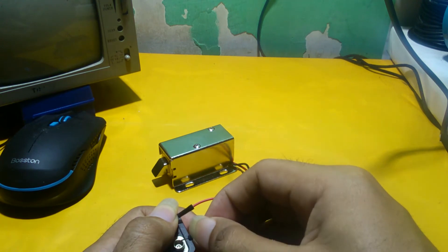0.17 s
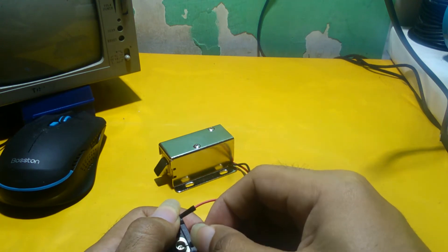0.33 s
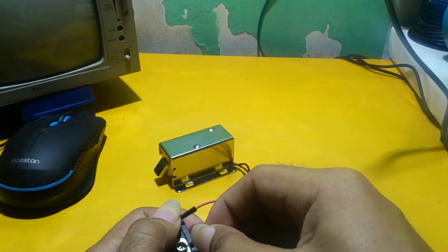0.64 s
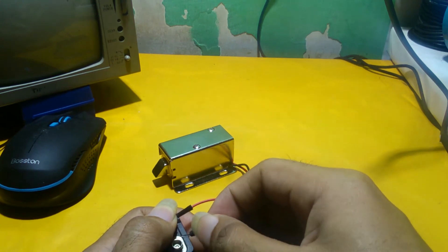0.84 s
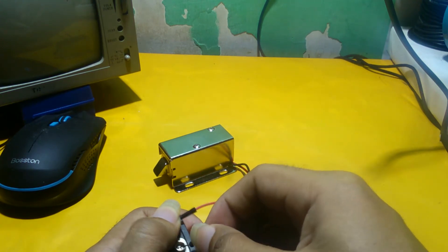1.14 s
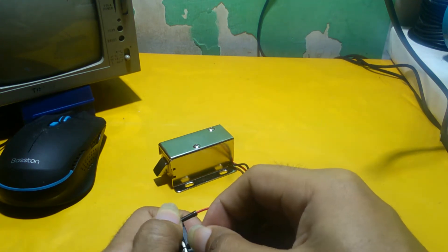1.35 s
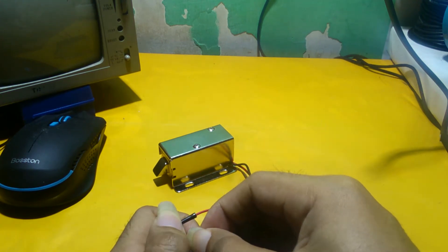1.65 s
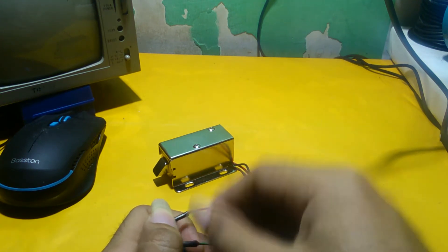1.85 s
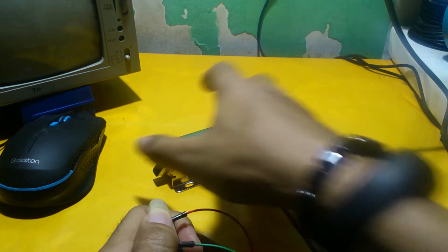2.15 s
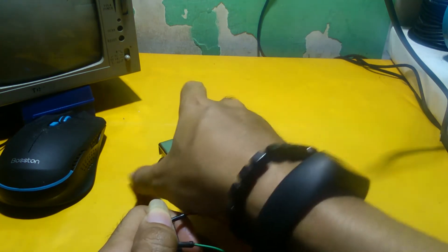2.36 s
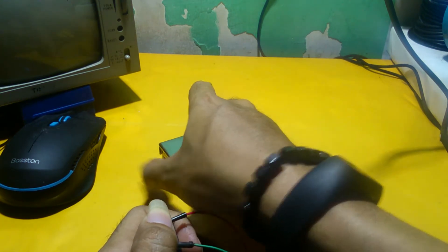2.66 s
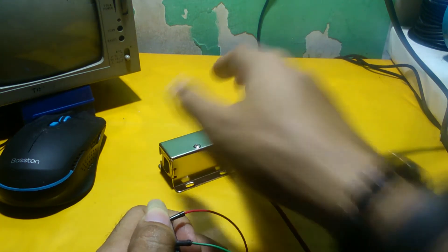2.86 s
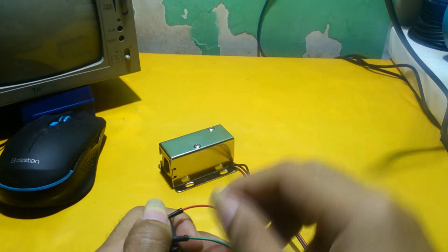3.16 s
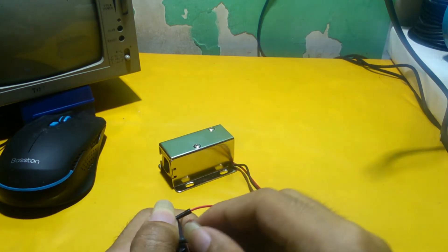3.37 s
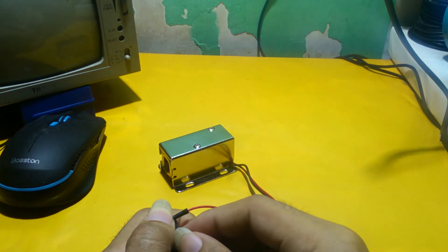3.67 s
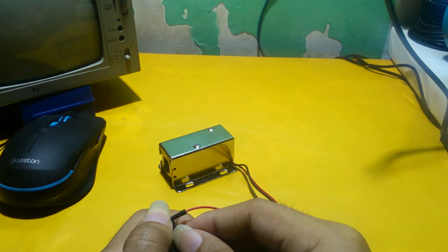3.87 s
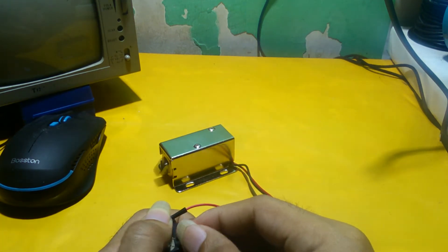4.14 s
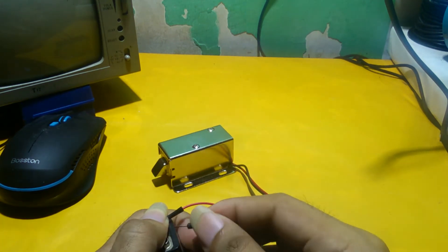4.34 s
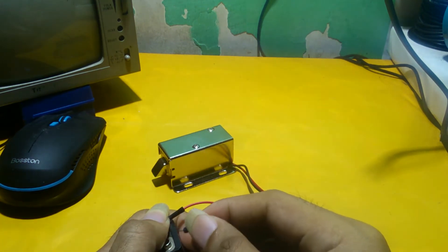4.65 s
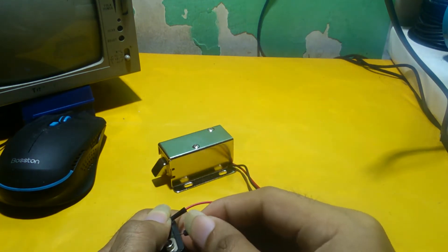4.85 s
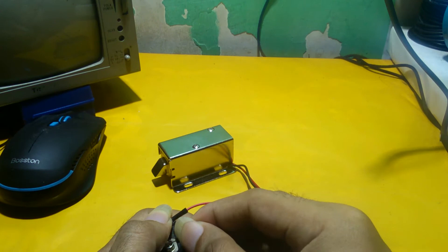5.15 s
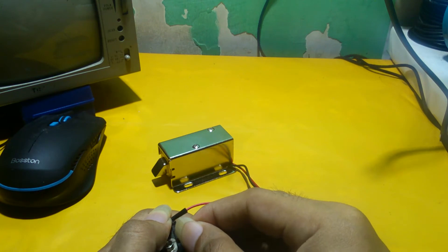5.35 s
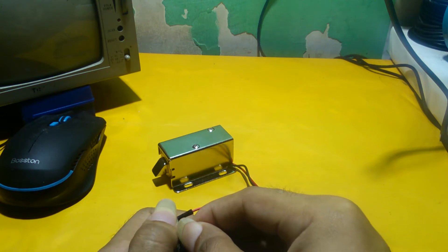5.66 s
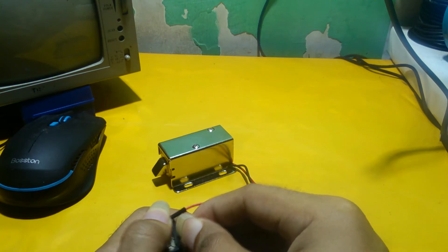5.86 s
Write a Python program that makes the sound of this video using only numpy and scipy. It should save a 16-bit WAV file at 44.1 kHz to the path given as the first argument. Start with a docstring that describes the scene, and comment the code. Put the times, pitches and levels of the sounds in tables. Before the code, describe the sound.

In a small quiet room, light handling ticks come from a metal door latch on a desk, close to the microphone and a little to the left. Its bolt clicks in sharply, then after a pause springs out with a bright clack and a slight knock on the desktop. Small ticks come near the end. Underneath are a soft wavering rumble, steady hiss, faint clock ticks and barely audible insect trills.

```python
"""Solenoid latch on a desk

A small latch on a wooden desk, close to a stereo phone and a little to its left. Wire and spring give light
ticks close by, a thumb snaps the bolt in and the spring throws it out; each blow rings metal and desk. A wall
clock steps its gears and an insect trills far off. Underneath, a low rumble wavers in the resonances of the
small room, over the hiss of the microphones."""
import sys
import numpy as np
from scipy import signal
from scipy.fft import rfft, irfft
from scipy.io import wavfile
from scipy.ndimage import uniform_filter1d

SR = 44100
rng = np.random.default_rng(int(sys.argv[2]) if len(sys.argv) > 2 else 0)


def to_wav(sig):
    """Store sig (one row per channel, or 1-D mono) as 16-bit WAV at the path in sys.argv[1].

    Samples outside -1..1 are clipped; the rate is SR.
    """
    pcm = np.clip(np.atleast_2d(sig), -1, 1) * 32767
    pcm = np.round(pcm).astype(np.int16)
    wavfile.write(sys.argv[1], SR, pcm.T)  # frames by channels


N = 264908
T = np.arange(N) / SR

# Blows on the latch; lean is always left microphone minus right: (time [s], peak of desk, plate,
# frame, catch, housing, plunger, bolt [dB each], lean [dB], chatter decay [ms])
LATCH_BLOWS = [(0.0004, -58, -53, -41, -49, -45.5, -52.5, -51.5, -2.5, 1.44),
               (0.3640, -74, -70, -63, -62, -55, -57, -46, 10, 0.61),
               (0.3674, -77, -75, -53, -52, -53.5, -55, -51, 8, 1.9),
               (0.7930, -65, -60, -45.5, -54, -46, -48, -38.5, 7, 6.1),
               (0.8027, -48.5, -39.5, -32.5, -47, -38.5, -46, -46, 5, 0.42),
               (0.8063, -47.5, -60, -48, -60, -42.5, -47, -50, 11, 1.8),
               (0.8111, -49, -47, -42.5, -49, -49, -51, -54, 6, 1.7),
               (1.1872, -66, -65, -59, -66, -64, -63, -64, 8, 5),
               (1.1930, -80, -75, -63, -68, -58, -58, -55, 3, 1),
               (1.2010, -76, -64, -54, -58, -51.5, -50, -60, 7.5, 0.85),
               (1.8770, -63, -69, -59, -68, -62, -63, -61, 1, 1.3),
               (2.4290, -60.5, -59, -57.5, -69, -62, -62, -64, 5, 13.6),
               (2.4930, -70, -68, -55, -66, -70, -74, -72, 1, 13),
               (2.542, -56, -62, -53.5, -56, -66, -64, -64, 5, 63),
               (2.5761, -44.5, -41.5, -24.5, -40.5, -23.5, -15.5, -19, 8, 1.33),
               (2.5805, -43, -36, -30, -62.5, -23.5, -21.5, -23, 5.5, 1.1),
               (2.5863, -54, -44, -35.5, -66, -33, -35.5, -38, 6.5, 2.3),
               (3.3700, -49, -64, -72, -80, -80, -81, -80, 1, 1.9),
               (3.39, -52, -71, -77, -80, -80, -80, -82, 1, 1.9),
               (4.1856, -49, -62, -42.5, -47.5, -45, -54, -56, 5.5, 5.3),
               (4.195, -48.5, -54, -35, -44, -48, -48, -57, -1, 4.3),
               (4.2030, -43, -44, -36, -46, -35, -33, -47, 12, 2.5),
               (4.2058, -30, -28.5, -29, -22.5, -19.5, -24.5, -19.5, 6, 1.07),
               (4.2107, -37, -28.5, -31, -45, -28.5, -21, -19, 2, 2.7),
               (4.2170, -45.5, -48, -32, -45, -30, -40, -30, 8, 1.8),
               (4.2241, -33, -38, -28.5, -34.5, -44.5, -32, -48, 0.5, 3.2),
               (4.2340, -48, -46, -32, -47, -33, -46, -50, 3, 4.1),
               (4.2421, -49, -40, -38, -55, -39.5, -49, -49, 9, 1.8),
               (4.2470, -44.5, -50, -36, -45, -33, -50, -55, 1, 0.58),
               (5.4478, -72, -60, -54, -63, -58, -57, -58, 4, 2.6),
               (5.9173, -78, -71, -67, -66, -55, -47, -45.5, -8, 1.2),
               (5.926, -67, -61, -49, -58, -51.5, -54, -53, -0.5, 4),
               (5.944, -59, -57, -46, -55, -60, -62, -66, 1, 1.8)]
# Modes of the desk, latch parts and clock: (frequency [Hz], relative level [dB], t60 [s], lean [dB])
DESK_MODES = [(158.5, -4.5, 0.11, 2), (222, -16, 0.032, 8), (278.7, -0.5, 0.082, 3.5), (333, 6, 0.033, 1.5),
              (410, -3.5, 0.025, 1.5), (488, -10, 0.093, -7.5)]
PLATE_MODES = [(679, -5.5, 0.02, 1), (870, -19.5, 0.03, -2.2), (926, 8.5, 0.016, -1.6),
               (1124, 1.5, 0.016, -1.95), (1280, -1, 0.018, 0)]
FRAME_MODES = [(1556, -7.5, 0.028, 3.4), (1887, 0, 0.025, 3.6), (2120, 6.5, 0.0088, 7.7),
               (2386, -1.5, 0.016, 7), (2660, -3, 0.0099, 3.3)]
CATCH_MODES = [(3435, -0.2, 0.012, 10), (3610, -0.8, 0.017, 6)]
HOUSING_MODES = [(3822, -4, 0.013, 6.6), (3900, -5, 0.012, 6), (4240, 1, 0.011, 4.3),
                 (4870, 4.5, 0.013, 7.8), (5130, 5, 0.017, 2)]
PLUNGER_MODES = [(6100, 0, 0.018, -4), (6535, 2.4, 0.017, 15), (7050, 1.2, 0.019, -6.5),
                 (7580, -1.8, 0.016, -13), (8050, 1.4, 0.013, -6.5), (8500, -2, 0.0052, -8)]
BOLT_MODES = [(9210, -0.5, 0.018, -2), (9820, 3, 0.024, -15.5), (10170, -3, 0.031, 13.5),
              (11100, 4.5, 0.014, -0.5), (11920, -2, 0.008, 3.5), (12600, -10, 0.007, -11),
              (13800, -18, .006, -11)]
CLOCK_MODES = [(1470, -6, 0.0097, -1), (1690, -13, 0.015, 19), (2144, 2, 0.014, 19), (2600, -9, 0.0059, 21),
               (3000, -5, 0.0062, 0), (3500, -2, 0.011, 21)]
# Three low room resonances: (frequency [Hz])
RESONANCES_HZ = [59.8, 83.4, 113.3]
# Rumble in those resonances: (time [s], low [dB], middle [dB], high [dB])
RUMBLE_LEVELS = [(0.0, -79, -67.5, -63), (0.37, -63.5, -54, -67.5), (0.78, -61.5, -51, -73),
                 (0.8, -68, -55.5, -69), (1.25, -56.5, -56.5, -67), (1.37, -82, -57.5, -64),
                 (1.44, -59, -48.5, -67), (1.69, -66, -69, -68), (1.74, -56, -55, -64),
                 (1.99, -62, -62, -73), (2.87, -64.5, -55, -64.5), (3.19, -63.5, -65.5, -67.5),
                 (4.13, -58.5, -62.5, -73), (4.16, -63, -65, -63.5), (4.83, -62.5, -60, -75),
                 (5.11, -48, -69.5, -67), (5.23, -68.5, -64, -66), (5.58, -59, -76, -69),
                 (5.97, -59, -59, -64.5), (6.0, -58, -74, -72)]
# Room murmur and microphone hiss: (frequency [Hz], relative density [dB])
AIR_SPECTRUM = [(20, 15.5), (32, 7), (48, 14), (80, 10), (115, 8.5), (140, 3), (190, 0), (280, -7),
                (480, -9.5), (685, -12), (1070, -15), (1400, -19), (2500, -19.5), (4500, -21), (6300, -22),
                (7900, -19), (9800, -24), (14300, -27.5)]
# Drift of the treble hiss: (time [s], gain [dB])
HISS_DRIFT = [(0, 2.5), (.3, 1.5), (1, 2), (1.7, 1.5), (2.3, 3), (2.9, 3.5), (3.3, 2.15), (4, 1.9),
              (4.8, 1.8), (5.3, 1.6), (5.6, 4), (6.01, -0.5)]
# Likeness of diffuse sound at the two microphones: (frequency [Hz], correlation [0..1])
MIC_CORRELATION = [(30, 0.51), (60, 0.85), (130, 0.92), (290, 0.7), (630, 0.48), (1400, 0), (15000, 0)]
# Light contact ticks, and one short ring of the latch frame as the bolt snaps:
# (time [s], peak [dB], pitch [Hz], t60 [s], lean [dB])
CONTACT_TICKS = [(.3493, -53, 8500, .002, 0), (0.3637, -42.5, 2260, 0.014, 15),
                 (.3643, -40.5, 10950, 0.0089, 3), (0.367, -44, 2240, 0.012, 17),
                 (.7846, -50, 10000, .002, 0), (1.1885, -52, 2250, .012, 5), (1.2018, -48, 1910, 0.019, 13),
                 (1.202, -48, 3600, 0.0054, 10), (2.5776, -30.5, 1515, 0.04, 11),
                 (5.9164, -34.5, 9200, .004, 3), (5.9177, -48, 6200, .005, -4),
                 (4.1811, -27.5, 7540, .0015, 8), (4.1832, -34, 7460, .004, 4)]
# Far insect trills: (start [s], time until release [s], level [dB])
INSECT_TRILLS = [(.42, 1.25, -75.5), (4.416, 0.65, -78)]
# Gear steps within one clock tick: (offset [s], gain [dB])
GEAR_STEPS = [(-.014, -5), (0, 0), (.022, -10.5), (.036, -21), (.052, -27)]
# Decay of the room's echo: (frequency [Hz], t60 [s])
ECHO_DECAY = [(150, 0.29), (600, 0.43), (1500, 0.29), (4000, 0.36), (8000, 0.36), (14000, 0.26)]
# Colour of the echo: (frequency [Hz], relative level [dB])
ECHO_COLOUR = [(120, -10), (300, -2), (1000, -4), (2200, -8), (2700, -5.5), (3000, -5), (3400, -13),
               (3800, -5.5), (5000, -5.5), (7000, -3), (10000, -4.5), (14000, -0.5)]
# Side the echo favours: (frequency [Hz], lean [dB])
ECHO_LEAN = [(300, 2), (2000, 0), (4500, 2.5), (6500, -7), (14000, -6)]

TRILL_HIGH_HZ, TRILL_LOW_HZ, TRILL_WIDTH_HZ = 3290, 3060, 130
TRILL_WAVER_HZ, TRILL_SAG_HZ_PER_S = 12, 60
TRILL_ATTACK_S, TRILL_RELEASE_S, TRILL_FADE_DB_PER_S = .2, .15, 3


def undb(db):
    """Decibels to amplitude."""
    return 10 ** (np.asarray(db) / 20)


def on_log(hz, table):
    """Read (Hz, value) rows on a log-frequency axis."""
    freqs, values = np.transpose(table)
    return np.interp(np.log(np.maximum(hz, 1)), np.log(freqs), values)


def walk(per_s):
    """Smooth random drift, per_s steps a second, with a spread near 1."""
    hold = int(SR / per_s)
    steps = np.repeat(rng.standard_normal(N // hold + 1), hold)
    return 2 * uniform_filter1d(uniform_filter1d(steps, hold), hold)[:N]


def stereo_noise(size):
    """Frequencies and noise spectra at the two microphones: alike in the bass, unrelated on top."""
    hz = np.fft.rfftfreq(size, 1 / SR)
    alike = on_log(hz, MIC_CORRELATION)
    mid, side = rfft(rng.standard_normal((2, size)))
    mid, side = mid * np.sqrt((1 + alike) / 2), side * np.sqrt((1 - alike) / 2)
    return hz, np.array([mid + side, mid - side])


def lean(db):
    """Gains for (left, right, room feed) that put the left db above the right."""
    return undb(np.array([[db], [-db], [0]]) / 2)


def add(track, start, sound):
    """Mix sound into track from start, in seconds."""
    i = int(start * SR)
    sound = sound[:, :N - i]
    track[:, i:i + sound.shape[1]] += sound


def chatter(decay_ms):
    """One blow: a burst of uneven contacts that builds quickly and dies away."""
    age = np.arange(SR // 20) / SR * 1000 / decay_ms
    contacts = rng.standard_normal(len(age)) * undb(2.1 * rng.exponential(size=len(age)))
    return contacts * (1 - np.exp(-age / 0.36)) * np.exp(-age)


def ring(modes, lag_s, spot_db=1.2):
    """Modes at the left microphone, the farther right one and the walls, varied by the spot struck."""
    t = np.arange(SR // 8) / SR
    since_arrival = np.maximum(t - np.array([[0], [lag_s], [0]]), 0)
    t60_scale = np.array([[1], [1], [0.43]])  # the walls hear every face, so modes blur into bands
    out = np.zeros((3, len(t)))
    for hz, db, t60, lean_db in modes:
        detune, spot = rng.standard_normal(2)
        phase = 2 * np.pi * hz * (1 + 0.018 * detune) * since_arrival
        decay = undb(-60 * t / (t60 * t60_scale))
        out += undb(db + spot_db * spot) * lean(lean_db) * np.sin(phase) * decay
    return out


def strike(modes, push, peak_db, lag_s=0.0002655, widen=1):
    """A push rings the modes up to a peak at the microphones; the room feed gets equal energy."""
    body = ring(modes, lag_s)
    sound = signal.fftconvolve(body, push[None], axes=1)[:, :body.shape[1]]
    sound[2] = body[2]  # over all directions the contacts merge into one even knock
    # a small body moves little air below its lowest mode or above its highest
    band_hz = [.92 * modes[0][0] / widen, min(1.07 * modes[-1][0] * widen, .45 * SR)]
    sound = signal.sosfilt(signal.butter(3, band_hz, "band", fs=SR, output="sos"), sound)
    sound[2] *= np.sqrt(np.mean(sound[:2] ** 2) / np.mean(sound[2] ** 2))
    return sound * undb(peak_db) / np.abs(sound[:2]).max(axis=1).mean()


def latch():
    """Close, a little left: each blow rings every metal part and thumps the desk below."""
    parts = [FRAME_MODES, CATCH_MODES, HOUSING_MODES, PLUNGER_MODES, BOLT_MODES]
    out = np.zeros((3, N))
    for start, desk_db, plate_db, *part_dbs, lean_db, decay_ms in LATCH_BLOWS:
        push = chatter(decay_ms)
        metal = sum(strike(modes, push, db) for modes, db in zip(parts, part_dbs))
        metal += strike(PLATE_MODES, push, plate_db, lag_s=0.0001)
        # the wide desk top feels one downward push and reaches both microphones at once
        desk = strike(DESK_MODES, np.abs(chatter(decay_ms=0.23)), desk_db, lag_s=0)
        add(out, start, metal * lean(lean_db) + desk)
    return out


def rumble(waver=0.0262, throb_db=2):
    """All around: each low room resonance wavers in pitch and throbs on its own."""
    times, *levels = np.transpose(RUMBLE_LEVELS)
    out = 0
    for hz, db in zip(RESONANCES_HZ, levels):
        phase = 2 * np.pi * np.cumsum(hz * (1 + waver * walk(9))) / SR
        mic_phase = 0.13 * walk(6) * np.array([[1], [-1]])
        rms = undb(np.interp(T, times, db) + throb_db * walk(16))
        out += np.sqrt(2) * rms * np.sin(phase + mic_phase + 2 * np.pi * rng.random())
    return out


def murmur_and_hiss(level_db=-66):
    """Steady room murmur under microphone hiss whose treble drifts a little."""
    hz, spectrum = stereo_noise(N)
    spectrum *= undb(on_log(hz, AIR_SPECTRUM))
    above_bass = irfft(spectrum * (hz > 140), N)
    spectrum *= undb(level_db) / np.sqrt(np.mean(above_bass ** 2))
    treble = np.clip(np.log2(np.maximum(hz, 1) / 810), 0, 1)
    drift = undb(np.interp(T, *np.transpose(HISS_DRIFT)))
    return irfft(spectrum * (1 - treble), N) + irfft(spectrum * treble, N) * drift


def contact_ticks(room_trim_db=-4):
    """Close up: light contact ticks and one short ring of the frame, each a single damped resonance."""
    out = np.zeros((3, N))
    for start, db, hz, t60, lean_db in CONTACT_TICKS:
        add(out, start, strike([(hz, 0, t60, lean_db)], chatter(decay_ms=0.14), db, widen=1.77))
    out[2] *= undb(room_trim_db)
    return out


def insect(low_strand_db=-5, throb_db=.8):
    """Far off: two narrow, sagging strands, blurred by distance and unrelated at the microphones."""
    narrow = signal.butter(2, TRILL_WIDTH_HZ / 2, fs=SR, output="sos")
    out = 0
    for hz, strand_db in [(TRILL_HIGH_HZ, 0), (TRILL_LOW_HZ, low_strand_db)]:
        cos_noise, sin_noise = signal.sosfilt(narrow, rng.standard_normal((2, 2, N)))
        waver = np.cumsum(TRILL_WAVER_HZ * walk(6)) / SR
        throb = undb(strand_db + throb_db * walk(9))
        for start, hold, db in INSECT_TRILLS:
            age = T - start
            phase = 2 * np.pi * ((hz - TRILL_SAG_HZ_PER_S * age / 2) * age + waver)
            strand = cos_noise * np.cos(phase) + sin_noise * np.sin(phase)
            strand /= np.sqrt(np.mean(strand ** 2))
            swell = np.clip(age / TRILL_ATTACK_S, 0, 1)
            release = np.clip(1 - (age - hold) / TRILL_RELEASE_S, 0, 1)
            out += strand * undb(db - TRILL_FADE_DB_PER_S * age) * swell * release * throb
    return out


def wall_clock(first_s=.5783, period_s=1.0012, peak_db=-57):
    """On the wall: one tick a second, each a few quick steps of plastic gears."""
    out = np.zeros((3, N))
    for start in np.arange(first_s, N / SR - period_s / 4, period_s):
        for offset, step_db in GEAR_STEPS:
            add(out, start + offset, strike(CLOCK_MODES, chatter(decay_ms=4.8), peak_db + step_db))
    return out


def room_echo(feed, build_s=0.0012):
    """The small room's diffuse echo: a noise tail that decays in half-octave bands."""
    size = SR // 2
    t = np.arange(size) / SR
    hz, spectrum = stereo_noise(size)
    spectrum *= undb(on_log(hz, ECHO_COLOUR))
    tail = 0
    for centre in 100 * 2 ** np.arange(0, 7.5, .5):
        octaves_off = np.abs(np.log2(np.maximum(hz, 1) / centre))
        band = irfft(spectrum * np.clip(1 - 2 * octaves_off, 0, 1), size)
        decay = undb(-60 * t / on_log(centre, ECHO_DECAY))
        tail += band * lean(on_log(centre, ECHO_LEAN))[:2] * decay
    tail *= np.clip(t / build_s, 0, 1) ** 2
    tail /= np.sqrt(np.sum(tail ** 2) / 2)
    return signal.fftconvolve(feed[None], tail, axes=1)[:, :N]


def scene():
    """At the phone: the close latch is fairly dry, the farther clock mostly echo."""
    near, far = latch() + contact_ticks(), wall_clock()
    echo = room_echo(undb(-5.5) * near[2] + undb(4.5) * far[2])
    return near[:2] + far[:2] + echo + insect() + rumble() + murmur_and_hiss()


def record(dry):
    """The phone cuts the top steeply above 14.2 kHz."""
    return signal.sosfilt(signal.ellip(12, .2, 95, 14200, fs=SR, output="sos"), dry)


dry = scene()
out = record(dry)
to_wav(out)
```